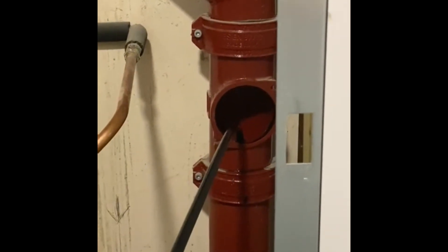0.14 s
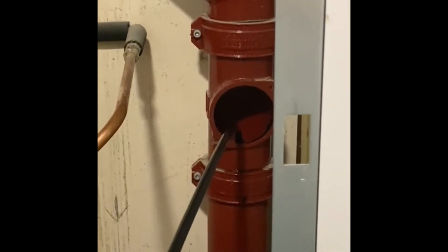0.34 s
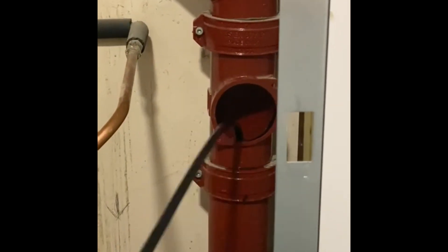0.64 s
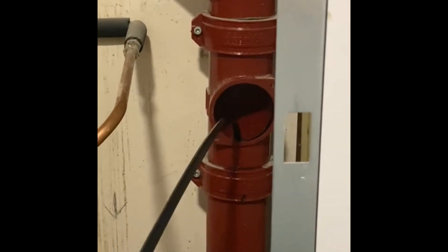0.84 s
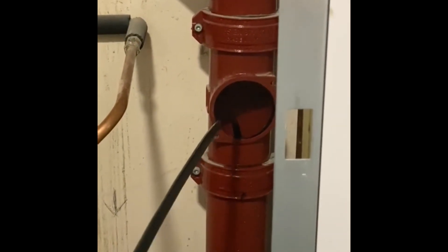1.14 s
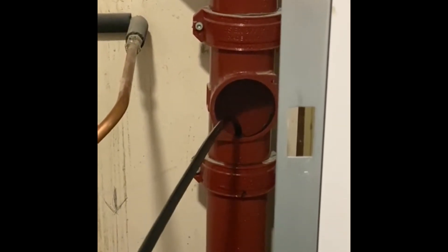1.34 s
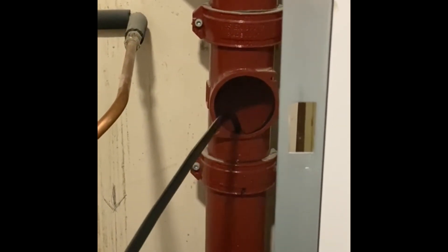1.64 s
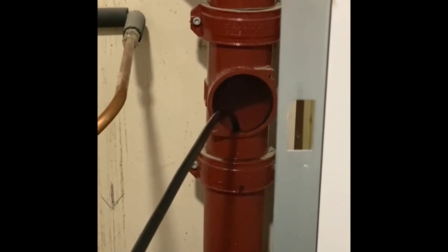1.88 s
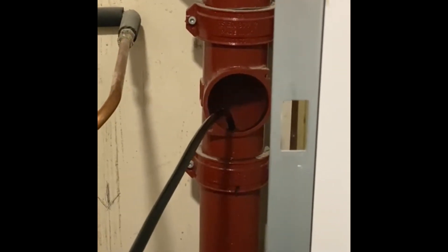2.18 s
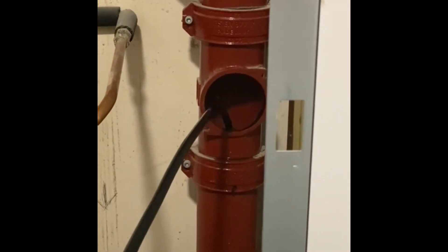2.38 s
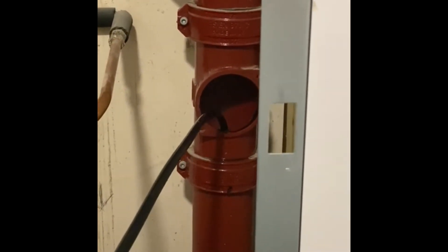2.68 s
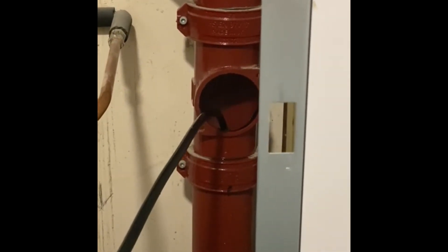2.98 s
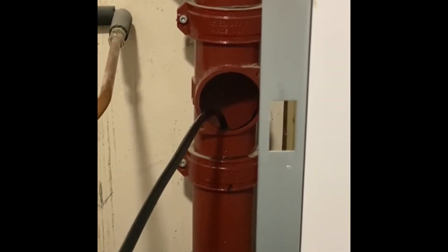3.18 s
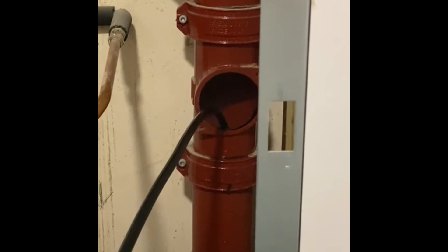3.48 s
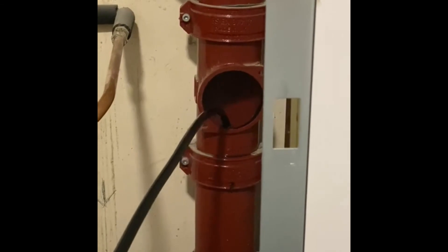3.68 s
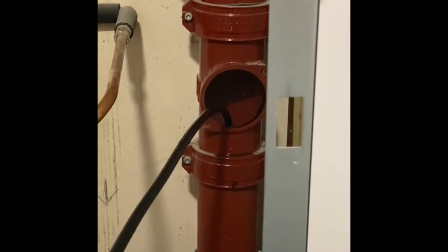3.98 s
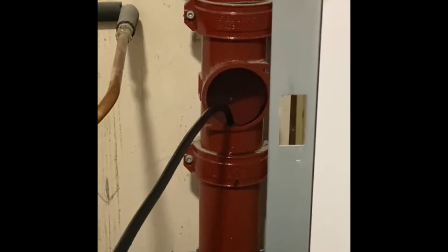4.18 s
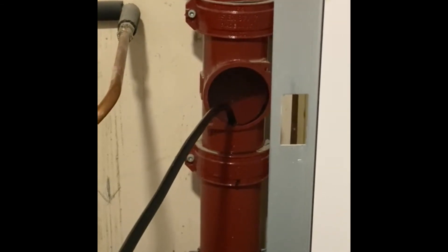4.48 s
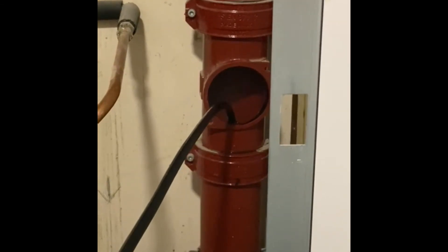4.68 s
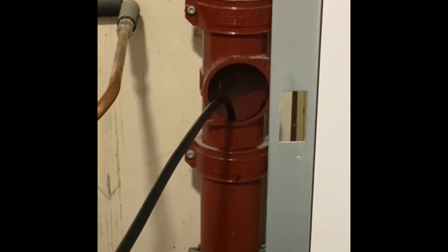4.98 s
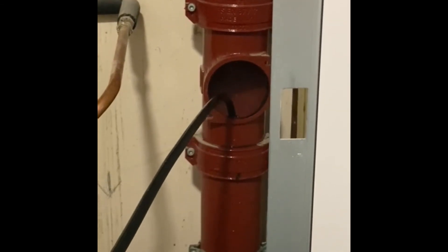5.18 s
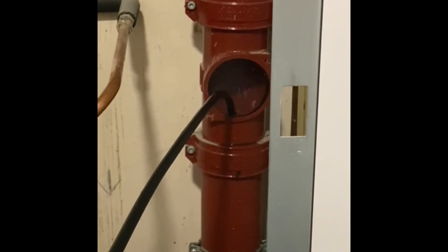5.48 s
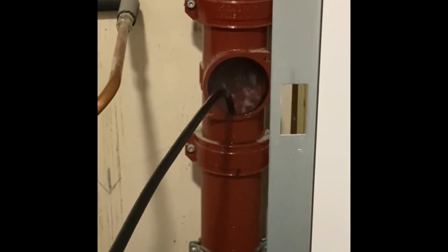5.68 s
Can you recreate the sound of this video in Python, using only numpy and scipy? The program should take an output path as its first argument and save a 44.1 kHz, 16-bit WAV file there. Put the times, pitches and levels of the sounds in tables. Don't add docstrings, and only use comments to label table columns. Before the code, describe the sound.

Close indoors, an electric drain-cleaning machine drones evenly as its spinning cable sprays, scrapes and occasionally knocks against a wet metal pipe.

```python
import sys
import numpy as np
from scipy import signal
from scipy.fft import rfft, irfft
from scipy.io import wavfile
from scipy.ndimage import uniform_filter1d

SR = 44100
rng = np.random.default_rng(int(sys.argv[2]) if len(sys.argv) > 2 else 0)


def master_out(mix):
    frames = np.transpose(np.atleast_2d(mix))
    ceiling = np.clip(frames, -1, 1)
    pcm = np.round(ceiling * 32767).astype(np.int16)
    wavfile.write(sys.argv[1], SR, pcm)


def ratio(d):
    e = np.asarray(d, float) / 20
    return 10 ** e


N = 257367
T = np.arange(N) / SR
CONTROL = 64

# t/s, place/-0.5 to 0.5
CAMERA_PLACE = [(0, -0.37), (.8, -0.32), (1.4, -0.22), (2, -0.082), (3, 0.083), (4, 0.29), (5, 0.27),
                (5.84, 0.38)]


def evened(x):
    return x / np.sqrt(np.mean(x ** 2) + 1e-20)


def read(points, hz):
    f, value = np.transpose(points)
    return np.interp(np.log(hz + 1), np.log(f + 1), value, left=-120, right=-120)


def curve(table):
    time_s, value = np.transpose(table)
    return np.interp(T, time_s, value)


def wander(top_hz):
    slow_hz = np.geomspace(.3, top_hz, 12)
    return evened(sum(np.sin(2 * np.pi * (f * T[::CONTROL] + rng.random())) for f in slow_hz))


def nearness():
    return 1 / 3 - 4 * curve(CAMERA_PLACE) ** 2


def shaft_angle():
    # t/s, speed/turns per s
    shaft_speed = [(0, 49.028), (1.2, 49.031), (1.6, 48.99), (2.4, 49.021), (4, 49.017), (4.8, 49.036),
                   (5.84, 49.022)]
    return 2 * np.pi * np.cumsum(curve(shaft_speed)) / SR


def noise(middle, side, patchy_db, flicker_db):
    frames, hz = N // 256 + 5, np.fft.rfftfreq(1024, 1 / SR)
    a, b, c, d, patches = rng.standard_normal((frames, 513, 5)).T
    patches = uniform_filter1d(patches, size=10, axis=0)
    patches = evened(uniform_filter1d(patches, size=12, axis=1))
    flicker = evened(uniform_filter1d(rng.standard_normal(frames), size=6))
    sum_bins = (a + 1j * b) * ratio(read(middle, hz))[:, None]
    diff_bins = (c + 1j * d) * ratio(read(side, hz))[:, None]
    bins = np.array([sum_bins, diff_bins]) * ratio(patchy_db * patches + flicker_db * flicker)
    mid, diff = signal.istft(bins, nperseg=1024, noverlap=768)[1][:, :N]
    return np.array([mid + diff, mid - diff]) / np.sqrt(np.mean(mid ** 2))


def rumble():
    # f/Hz, level/dB per Hz
    floor_spectrum = [(8, -19.5), (25, -13), (40, -8), (52, 0), (66, -5), (76, -1.5), (90, -6), (106, -4.5),
                      (125, -0.5), (160, -9), (200, -20)]
    # t/s, peak level/dB, length/s
    snags = [
        (.44, -34.5, 0.088),
        (1.048, -42, 0.086),
        (1.43, -42, .14),
        (2.396, -39.5, 0.16),
        (3.447, -36, 0.18),
        (4.903, -41.5, 0.17),
        (5.65, -37, .09),
    ]
    hz = np.fft.rfftfreq(N, 1 / SR)
    shake = evened(irfft(rfft(rng.standard_normal(N)) * ratio(read(floor_spectrum, hz)), N))
    steady_db = -46
    swells = sum(ratio(db) * np.exp(-((T - s) / length) ** 2) for s, db, length in snags)
    return shake * (ratio(steady_db) + swells)


def drum():
    # f/Hz, level/dB rms, waver/dB
    drum_tones = [(57.6, -50.5, 2.5), (115.4, -44.5, 1), (135.8, -56.5, 4.5)]
    out = np.zeros(N)
    for hz, db, waver_db in drum_tones:
        level = ratio(db + waver_db * wander(4.0).repeat(CONTROL)[:N])
        out += np.sqrt(2) * level * np.sin(2 * np.pi * (hz * T + rng.random()))
    return out


def casing():
    # f/Hz, level/dB per Hz
    casing_sum = [(120, -21), (170, 1), (230, -3), (285, -8.5), (370, -3.5), (460, -9), (700, -8.5),
                  (900, -13), (1200, -13.5), (1500, -15.5), (1750, -19.5), (1900, -18), (2300, -27.5)]
    # f/Hz, level/dB per Hz
    casing_side = [(150, -43.5), (260, -23), (400, -17), (600, -17), (900, -12), (1200, -12.5),
                   (1500, -19.5), (1800, -22), (2300, -35.5)]
    level_db, nearest_db = -40.5, 1.5
    shadow_hz, shadow_db = 1300, -6
    puff = 1 + 0.25 * np.cos(shaft_angle())
    air = noise(casing_sum, casing_side, patchy_db=1.3, flicker_db=1.0)
    low = signal.sosfiltfilt(signal.butter(4, shadow_hz, fs=SR, output="sos"), air)
    shadowed = low + (air - low) * ratio(shadow_db * curve(CAMERA_PLACE))
    return ratio(level_db + nearest_db * nearness()) * puff * shadowed


def taps():
    # t/s, peak level/dB, centre f/Hz, width/log frequency, left-right/dB
    rim_taps = [
        (.2974, -24, 1600, .45, 4),
        (.4033, -33, 2700, .4, -3),
        (.6654, -37, 3150, .13, 9),
        (0.9115, -36, 1990, .5, -10),
        (0.9497, -30.9, 3200, .26, 7),
        (1.12, -38, 2120, .4, -7),
        (1.6711, -34, 1700, .5, -6),
        (2.4388, -19.5, 3100, .55, 4),
    ]
    # f/Hz, level/dB, t60/s
    rim_modes = [(1420, -6.5, 0.081), (1700, 6, 0.022), (2135, 0, 0.044), (2553, 3.5, 0.027),
                 (3100, -6.5, 0.042), (3590, -6.5, 0.1), (4460, -11, 0.01), (4820, -15, 0.028),
                 (5570, -16, 0.021), (6000, -3, 0.026)]
    out, t = np.zeros((2, N)), np.arange(8000) / SR
    hz = np.fft.rfftfreq(len(t), 1 / SR)
    ring = sum(ratio(db - 60 * t / decay) * np.sin(2 * np.pi * f * t) for f, db, decay in rim_modes)
    for s, peak_db, centre_hz, width, pan_db in rim_taps:
        tail_t60 = .22 if peak_db > -31.5 else .07
        tail = 0.38 * rng.standard_normal((2, len(t))) * ratio(-60 * t / tail_t60) * np.minimum(t / 0.005, 1)
        tail = 1.35 * tail[0] + 0.79 * tail
        struck = np.exp(-(np.log((hz + 1) / centre_hz) / width) ** 4)
        sound = irfft(rfft(ring / 2 + tail) * struck, len(t))
        sound *= np.minimum(t / 0.00026, 1) * (1 - t / t[-1])
        sound *= ratio(peak_db + np.array([[pan_db], [-pan_db]]) / 2) / abs(sound).max()
        out[:, round(s * SR):][:, :len(t)] += sound
    return out


def pipe_hiss():
    # f/Hz, level/dB per Hz
    hiss_sum = [(1700, -23), (1900, -7.5), (2040, 2.5), (2170, -3.5), (2500, 1), (3130, -5), (3610, -2),
                (4720, -4.5), (5020, -11.5), (5300, -5), (6400, -4), (6950, -6.5), (8200, -12.5),
                (9000, -28)]
    # f/Hz, level/dB per Hz
    hiss_side = [(1800, -13.5), (2200, -10.5), (2600, -6), (3100, -12.5), (4100, -14), (4600, -3.5),
                 (5700, -5.5), (7000, -0.5), (8800, 1.6), (9400, -12.5), (10000, -2), (11300, -1.5),
                 (11800, -10.5), (12300, -21)]
    # t/s, level/dB
    bite = [(0, -5), (.7, -2), (1.4, -3.5), (2.6, 0.5), (3.2, 0.9), (4.2, 1.5), (5.84, 2.5)]
    lift_db, body_db, spray_db = 5.5, -52.5, -50
    body_follows, body_nearest_db, scrape_depth = 0.42, 4.5, .08
    hiss = noise(hiss_sum, hiss_side, patchy_db=1.09, flicker_db=0.49)
    hiss = hiss * (1 + scrape_depth * evened(uniform_filter1d(rng.standard_normal(N), size=200)))
    body = signal.sosfiltfilt(signal.butter(2, 4400, fs=SR, output="sos"), hiss)
    bite_db = curve(bite)
    body_level = ratio(body_db + body_follows * bite_db + body_nearest_db * nearness())
    return ratio(lift_db) * (body_level * body + ratio(spray_db + bite_db) * (hiss - body))


def motor():
    bass_db = [-37, -38, -39, -48, -45]
    # order, level/dB rms, left-right/dB, left leads/rad,
    # change/dB as the camera crosses standing waves
    casing_orders = [(6, -52, -2, .1, 0), (7, -49, -2, .1, -2), (8, -51, 2, .4, -7), (9, -50, -2, -.3, 0),
                     (11, -50, 3, -.5, 0), (13, -51, -2, .5, -1), (14, -48, 2, -.2, 3),
                     (15, -50, 4, -.1, 6), (17, -54, 0, -.3, 4.5), (18, -56, 1, .3, 7.5),
                     (19, -52, 1, .1, -6), (20, -61, 8, .3, 0), (21, -57, 6, .6, 0),
                     (22, -51, 0, -.6, -11.5), (23, -49, 0, 0, 5.5), (24, -57, 9, -2.5, 1),
                     (25, -48, 3, .7, 2), (26, -52, 11, .2, 1.5), (27, -66, 5, 2.6, -10),
                     (28, -60, 9, 1.1, -20), (29, -56, 5, .9, -21.5), (31, -62, -5, -.6, -2.5),
                     (33, -63, 0, 0, -11), (35, -60, 0, 0, 8.5)]
    answer = [(1, -1.3), (2, 2.4), (3, 1.9), (4, -1.2), (7, -2.1), (8, .2), (13, -.8), (14, -2.7), (15, .1),
              (16, -1.5), (22, 3), (39, 12)]
    # t/s, level/dB
    load = [(0, -1.5), (.6, -2), (1.5, 0.5), (2.2, -0.5), (2.8, 0), (4.3, 0), (5.3, -0.5), (5.55, 2),
            (5.84, 3.5)]
    # order, level against the order/dB, lead/beats
    pull_below = [(2, -14, -0.19), (5, -13.5, .025), (6, -7.5, -.22), (11, -9, .045), (13, -13.5, 0.16),
                  (14, -11, .084)]
    # order, level against the order/dB, lead/beats
    pull_above = [(2, -7, -0.18), (3, -12.5, 0.51), (4, -5, 0.036), (5, 0.5, -0.28), (6, -9.5, -.26),
                  (7, -9, .021), (13, -2, .4)]
    # order, level against the order/dB, lead/beats
    pull_twice = [(4, -11.5, 0.29), (5, -9, -0.45), (6, 0, .16), (7, -15, 0.45)]
    slip_hz, slip_start_s, wobble_rad = 2.04, .181, .08
    faint_db, top_order = -64, 37
    nearest_db_per_order, nearest_from_order = .45, 11

    beat = 2 * np.pi * slip_hz * (T - slip_start_s)
    turn = np.exp(1j * (shaft_angle() + wobble_rad * np.sin(beat))).astype("complex64")
    way, near, load_db = curve(CAMERA_PLACE)[::CONTROL], nearness()[::CONTROL], curve(load)[::CONTROL]
    rows = {int(k): rest for k, *rest in casing_orders}
    rows |= {k + 1: (db, 0, 0, 0) for k, db in enumerate(bass_db)}
    phase = np.cumsum(np.interp(np.arange(1, 40), *np.transpose(answer)))
    phase += rng.uniform(-.6, .6, 39) * (np.arange(39) > 15)

    throb = np.ones((top_order + 1, len(way)), complex)
    for beats, pulls in ((-1, pull_below), (1, pull_above), (2, pull_twice)):
        for k, db, lead in pulls:
            throb[round(k)] += ratio(db) * np.exp(1j * (beats * beat[::CONTROL] + 2 * np.pi * lead))

    order, out = np.ones(N, "complex64"), np.zeros((2, N))
    for k in range(1, top_order + 1):
        order = order * turn
        level_db, pan_db, lead, change_db = rows.get(k, (faint_db, 0, 0, 0))
        level_db = level_db + change_db * way
        level_db = level_db + nearest_db_per_order * max(k - nearest_from_order, 0) * near
        level_db = level_db + load_db * (1 < k < 6) + .7 * wander(2.5)
        size = np.sqrt(2) * ratio(level_db) * throb[k] * np.exp(1j * phase[k - 1])
        left = ratio(pan_db / 2) * np.exp(.5j * lead)
        right = ratio(-pan_db / 2) * np.exp(-.5j * lead)
        ports = np.array([left, right])
        heard = np.outer(ports / max(abs(ports.mean()), .3), size).astype("complex64")
        out += (heard.repeat(CONTROL, axis=1)[:, :N] * order).real
    return out


def scene():
    return rumble() + drum() + casing() + taps() + pipe_hiss() + motor()


def band_limit(x):
    return signal.sosfilt(signal.butter(12, 12100, fs=SR, output="sos"), x)


def record(dry):
    return band_limit(dry)


dry = scene()
out = record(dry)
master_out(out)
```